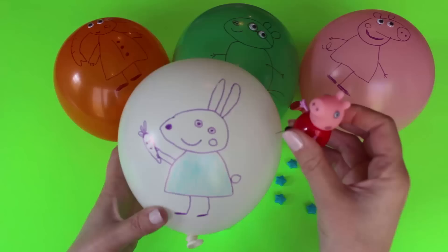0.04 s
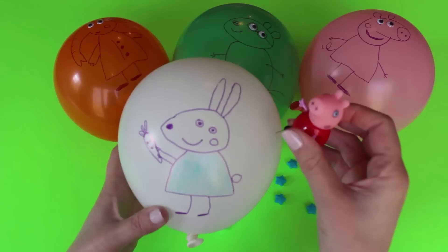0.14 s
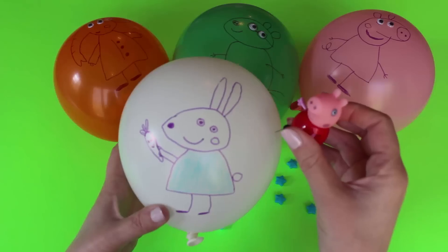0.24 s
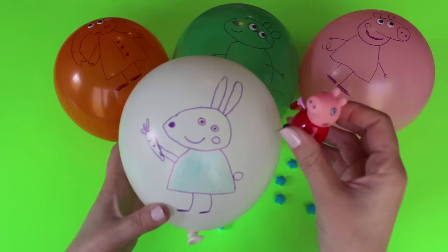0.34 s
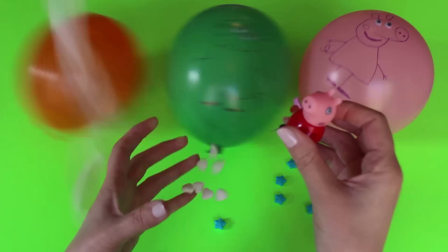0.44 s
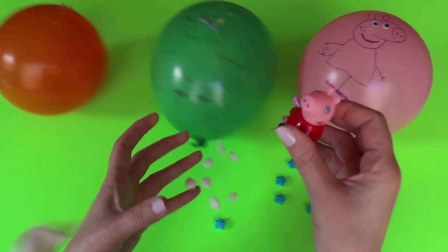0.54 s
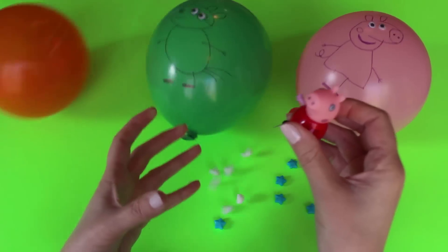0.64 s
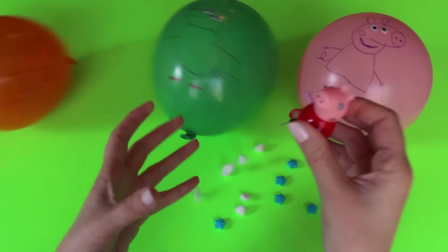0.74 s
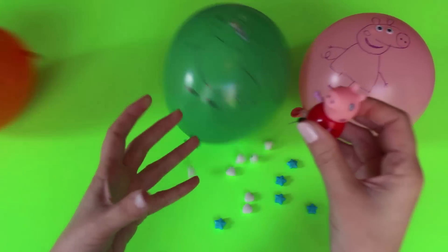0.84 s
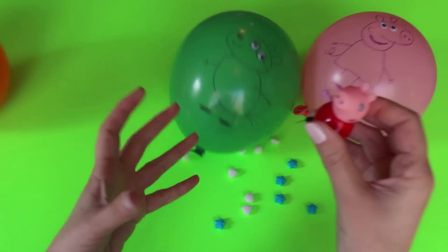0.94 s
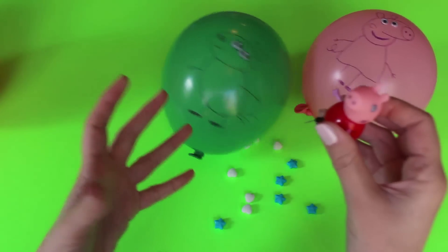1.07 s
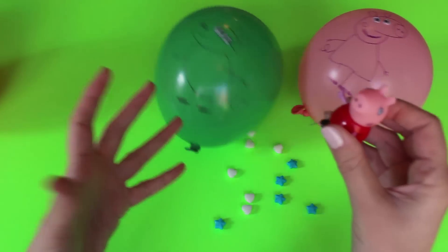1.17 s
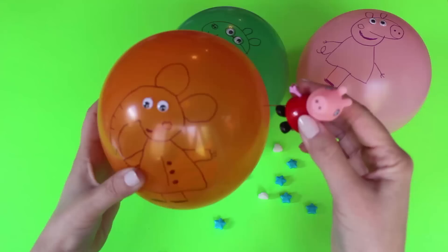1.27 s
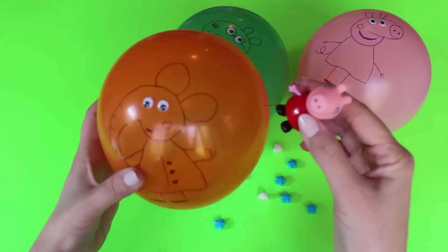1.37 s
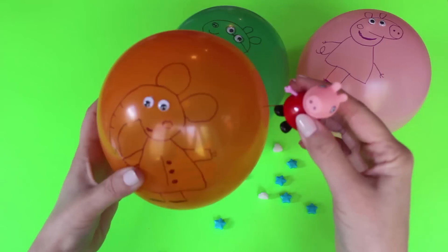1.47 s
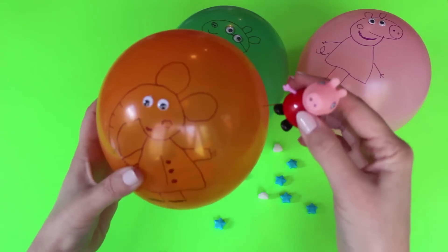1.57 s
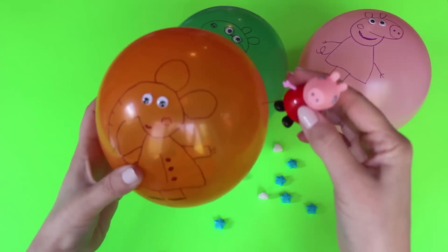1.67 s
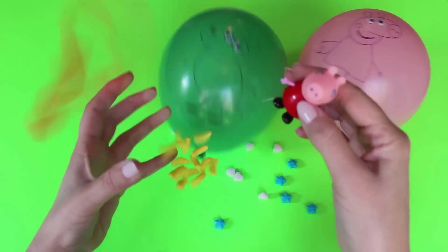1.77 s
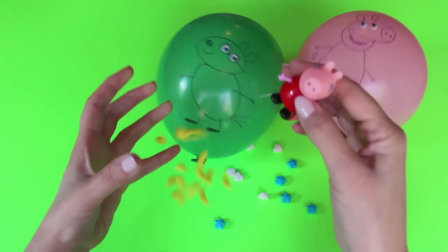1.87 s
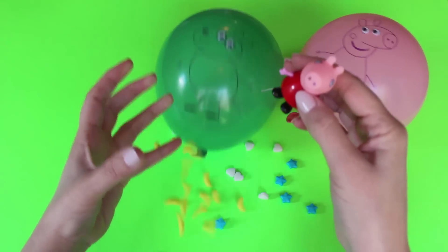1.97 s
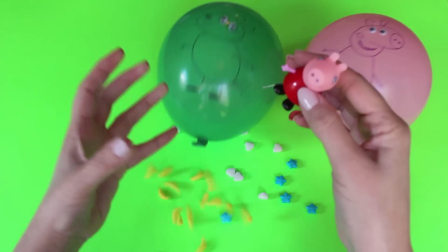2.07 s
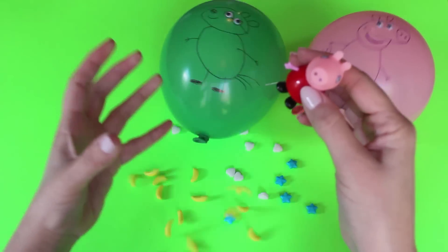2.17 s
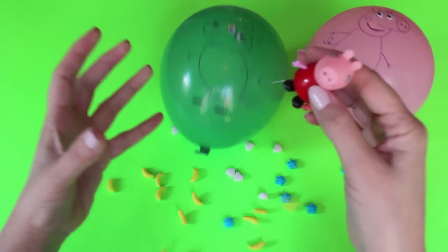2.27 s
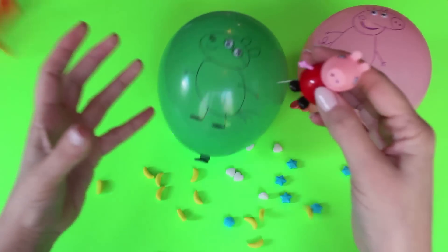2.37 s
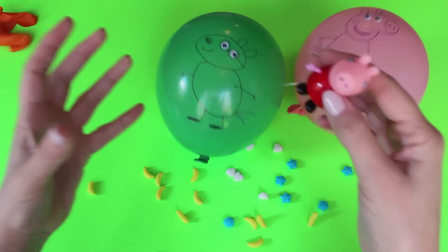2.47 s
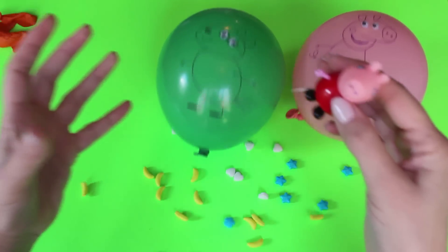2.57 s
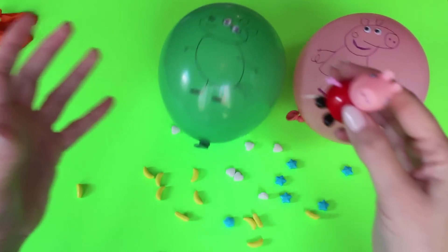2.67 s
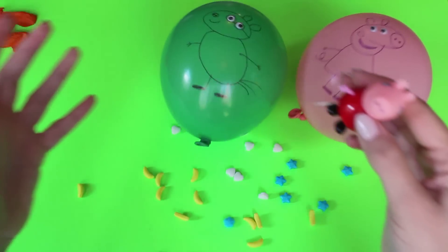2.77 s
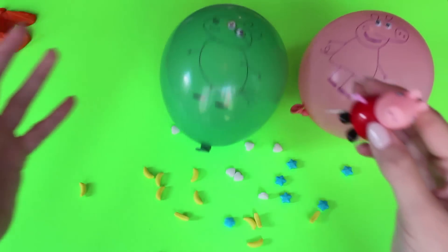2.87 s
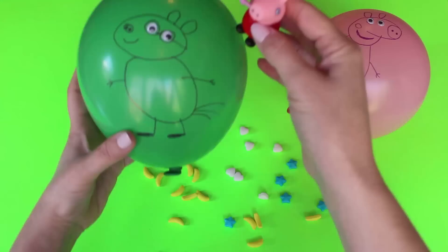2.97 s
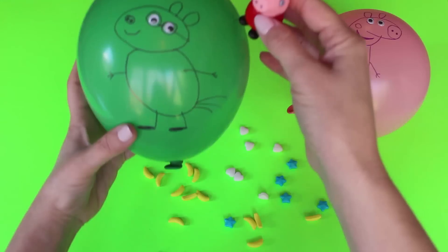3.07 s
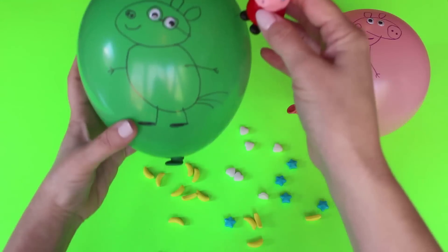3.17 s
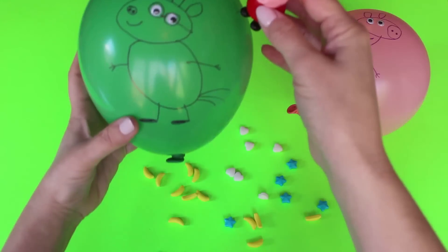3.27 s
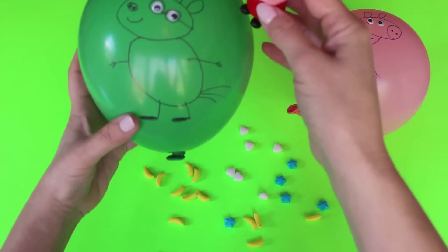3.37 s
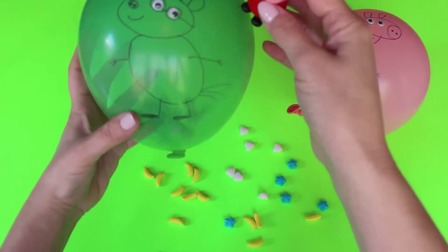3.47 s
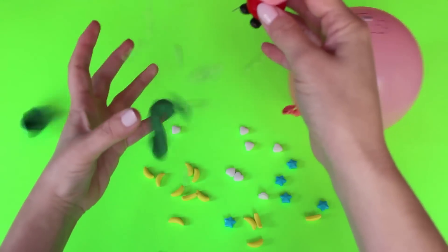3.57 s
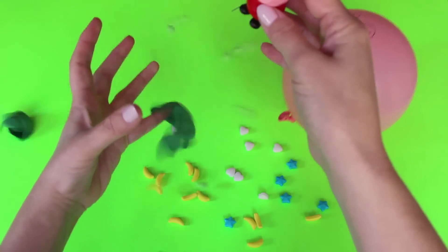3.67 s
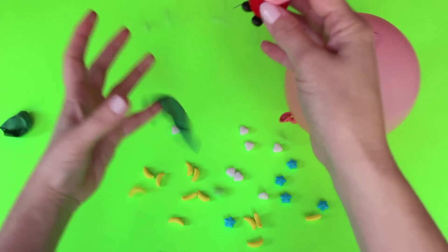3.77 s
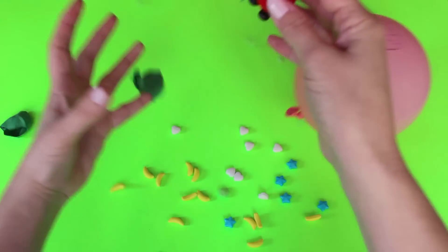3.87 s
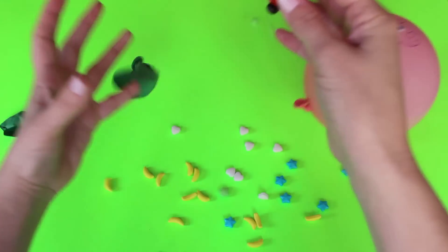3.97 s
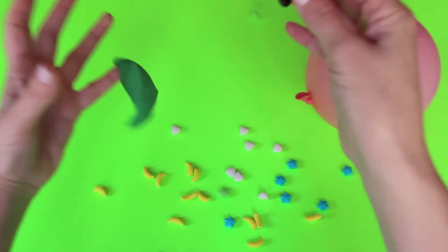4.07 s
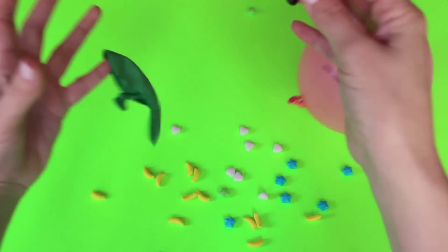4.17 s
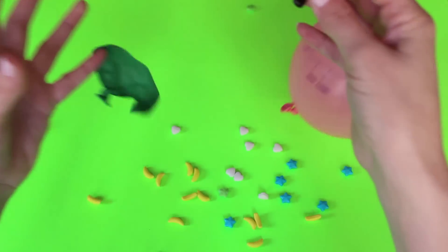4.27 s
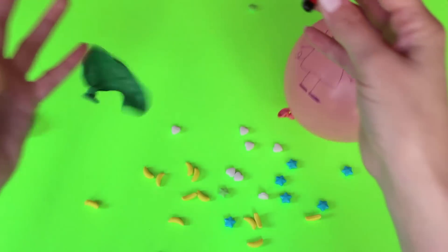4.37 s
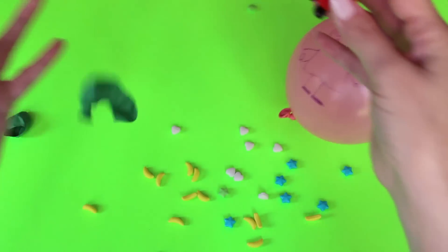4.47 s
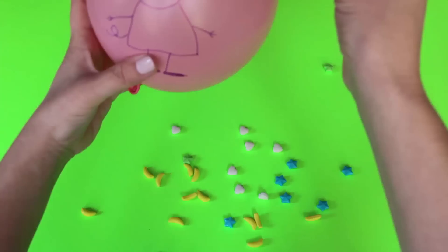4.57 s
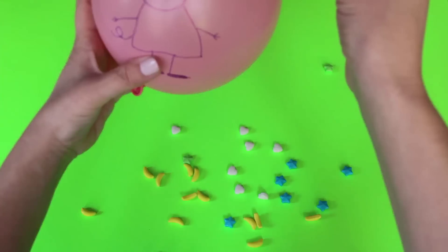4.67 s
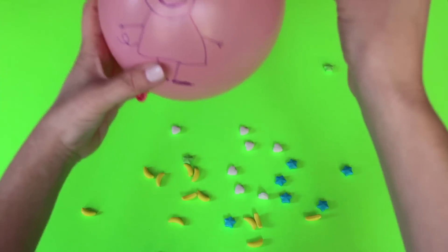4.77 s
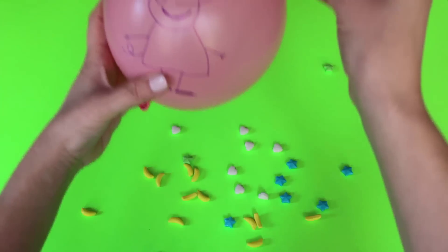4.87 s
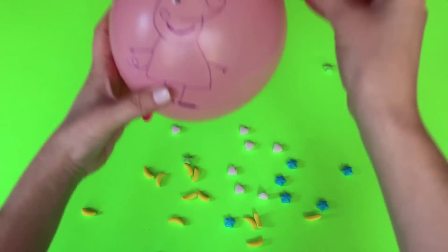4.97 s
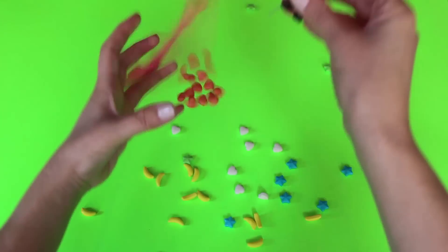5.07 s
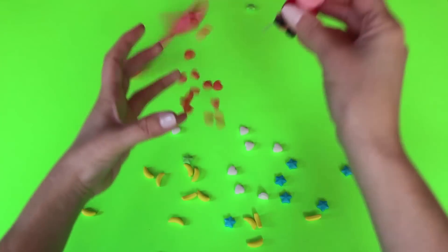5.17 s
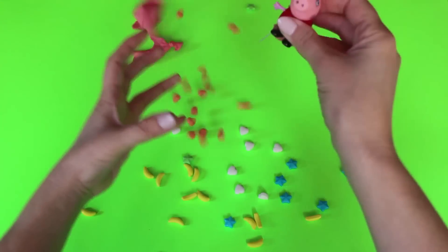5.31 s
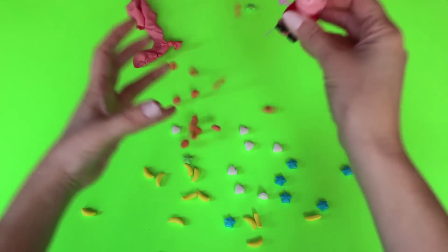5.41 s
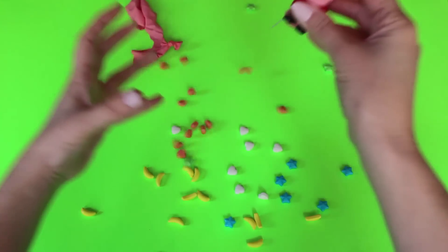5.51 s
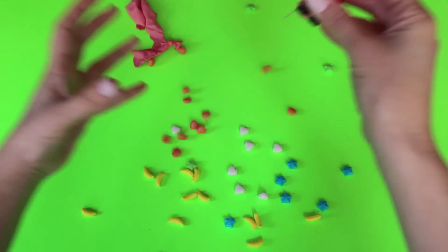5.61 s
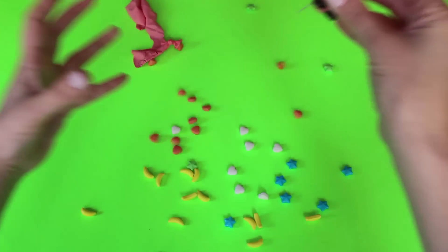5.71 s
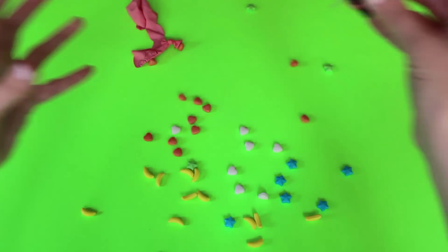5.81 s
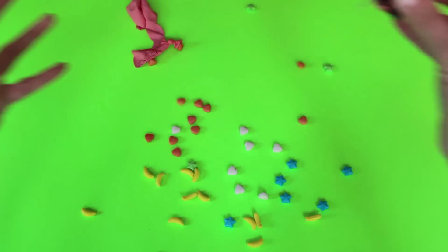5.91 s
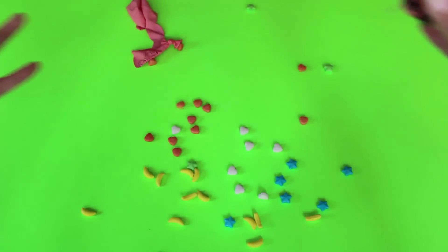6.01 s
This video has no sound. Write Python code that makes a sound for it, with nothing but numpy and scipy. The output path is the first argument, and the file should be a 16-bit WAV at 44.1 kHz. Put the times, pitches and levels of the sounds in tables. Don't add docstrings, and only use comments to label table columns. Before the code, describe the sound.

A short rattle and rub of hands on rubber opens over quiet room hum and hiss. At about 0.45 s the first balloon tears slowly with a tick and rip, then its air collapses in a clipped thump. The gain ducks and climbs, holding up a boomy, diffuse echo; soft bumps and sweets tick from 0.8 s until the sound drops abruptly to hush at 1.33. A quicker burst at 1.81 has a similar echo, with sparse hard ticks between 2.06 and 2.83, cutting near 3.03. The third bangs at 3.57; from 3.94 to 4.26 rubber scraps slap loudly and beads clatter, with a heavy knock at 4.15, ending at 4.60. The last, sharpest burst comes at 5.14, followed by sweets pattering left and right from 5.35 to 5.72, then a fading skitter and near silence after 6.05. The recorder is close in a bare room.

```python
import sys
import numpy as np
from scipy import signal
from scipy.fft import rfft, irfft, next_fast_len
from scipy.io import wavfile

SR = 44100
rng = np.random.default_rng(int(sys.argv[2]) if len(sys.argv) > 2 else 0)


def ratio(d):
    e = np.asarray(d, float) / 20
    return 10 ** e


def wrap_up_sound(samples):
    columns = np.atleast_2d(samples).T
    tamed = np.clip(columns, -1, 1)
    steps = np.round(tamed * 32767).astype(np.int16)
    wavfile.write(sys.argv[1], SR, steps)


N = 266663
T = np.arange(N) / SR
SIZE = next_fast_len(N)
HZ = np.maximum(np.arange(SIZE // 2 + 1) * SR / SIZE, 1)


def on_log(table, column=1):
    table = np.array(table, float)
    return np.interp(np.log(HZ), np.log(np.maximum(table[:, 0], 1)), table[:, column])


def unit(x):
    return x / np.sqrt(np.mean(x ** 2))


def band(x, hz, width_hz):
    b, a = signal.iirpeak(hz, hz / width_hz, fs=SR)
    return signal.lfilter(b, a, x)


def ring(t, hz, t60):
    return np.sin(2 * np.pi * hz * t) * ratio(-60 * t / t60)


def add(out, s, sound):
    i = int(s * SR)
    out[:, i:i + sound.shape[-1]] += sound[..., :N - i]


# frequency in Hz, left minus right in dB.
LEAN = [(60, -5.5), (110, -3.5), (200, -4.5), (370, -2), (690, -1), (1260, -1), (2330, -0.5), (4280, -0.5),
        (7870, -1), (14500, 3)]


def pair(colour, likeness):
    mid, side = rfft(rng.standard_normal((2, SIZE)))
    c = on_log(likeness)
    lean = on_log(LEAN) / 2
    both = np.sqrt(1 + c) * mid + np.sqrt(1 - c) * side * np.array([[1], [-1]])
    return both * ratio(on_log(colour) + np.array([lean, -lean]))


# skin tear in seconds, air collapse in seconds, change of scene in seconds.
POPS = [
    (.4517, .4849, 1.3344),
    (1.8119, 1.8210, 3.0344),
    (3.5653, 3.5658, 4.6014),
    (5.1440, 5.1450, 6.046),
]


def shots():
    age, on = np.zeros(N), np.zeros(N)
    for tear, _, cut in POPS:
        inside = (T > tear) & (T < cut)
        age[inside] = T[inside] - tear
        on[inside] = 1
    return age, on


def per_shot(table):
    balloon = np.minimum(np.searchsorted([cut for *_, cut in POPS], T), len(POPS) - 1)
    return np.array(table, float)[balloon].T


# level in dB, swell in dB.
HUSH = [(-63, 3.5), (-62.5, 2.5), (-62.5, 4), (-63, 3)]
# frequency in Hz, density in dB per Hz.
HUM = [(30, -6), (60, -10.5), (100, -7.5), (150, 1), (300, -4.5), (700, -11), (1400, -17), (3000, -19.5),
       (8000, -29.5), (12000, -38.5), (14000, -46.5)]
# frequency in Hz, left-right likeness from -1 to 1.
HUM_LIKENESS = [(60, 0), (130, 0.67), (290, 0.6), (630, 0.7), (1380, -0.17), (3020, 0.05), (6610, 0),
                (14500, 0.26)]
SWELL_S = .07


def hush():
    level_db, swell_db = per_shot(HUSH)
    wait_s = np.maximum(per_shot(POPS)[0] - T, 0)
    noise = unit(irfft(pair(HUM, HUM_LIKENESS), SIZE)[:, :N])
    return noise * ratio(level_db + swell_db * np.exp(-wait_s / SWELL_S))


# start in seconds, stop in seconds, centre in Hz, width in Hz,
# level in dB.
RUSTLE = [
    (0, 0.064, 4940, 503, -40),
    (0, 0.033, 2500, 3180, -42),
    (0.035, .0676, 300, 550, -36),
]


def rustle():
    out = np.zeros((2, N))
    for start, stop, hz, width_hz, level_db in RUSTLE:
        uneven = ratio(1.4 * np.repeat(rng.standard_normal(64), 64))
        noise = rng.standard_normal((3, 4096)) * uneven
        noise = noise[0] + 0.96 * noise[1:]
        noise = unit(band(band(noise, hz, width_hz), hz, 3 * width_hz))
        add(out, start, ratio(level_db) * noise[:, :int((stop - start) * SR)])
    return out


# time in seconds, swell of boom and rumble
# in dB, length in seconds.
BUMPS = [(0.81, 6, 0.009), (0.9, 4.5, 0.022), (1.03, 2, 0.025), (1.277, 10.5, 0.059), (2.08, 0.5, 0.01),
         (3.861, 3.5, .03), (3.991, -2, 0.0061), (4.17, 7, 0.024), (5.414, 3, 0.01), (5.544, 3.5, 0.017),
         (5.78, 3, 0.0091), (5.863, 2, 0.027)]


def bumps():
    return sum(db * np.exp(-((T - s) / length) ** 2) for s, db, length in BUMPS)


# frequency in Hz, left-right likeness from 0 to 1.
LIKENESS = [(60, .9), (130, 0.95), (290, .95), (630, 0.8), (1380, 0.7), (3020, 0.3), (6610, 0), (14500, 0)]
# table rumble at the tear in dB, rumble fall in dB per second,
# skitter relative to the echo in dB.
SHAKE = [(-34, 14.5, -25.5), (-34, 45.5, -27.5), (-35.5, 43, -23.5), (-31, 65, -24.5)]
RUMBLE_FLOOR_DB = -77


def rumble(age):
    # Hz, dB per Hz
    colour = [(20, -16), (45, -12.0), (80, -9.5), (130, -4.5), (170, 5.0), (300, -43.0)]
    low = irfft(pair(colour, LIKENESS), SIZE)[:, :N]
    start_db, fall, _ = per_shot(SHAKE)
    return unit(low) * (ratio(start_db - fall * age + 0.5 * bumps()) + ratio(RUMBLE_FLOOR_DB))


def after(falls, fade_s):
    jumps = np.zeros(N)
    for s, peak_db, *_ in falls:
        jumps[int(s * SR)] += ratio(peak_db)
    return signal.lfilter([1], [1, -np.exp(-1 / (fade_s * SR))], jumps)


# held level in dB, end of the hold in seconds after the
# tear, later fall in dB per second, boom fall in dB per second.
TAILS = [(-28, 0.42, 38, 8.5), (-25.5, 0.49, 35.5, 21.5), (-26.5, .55, 25, 23.5), (-25.5, 0.39, 43, 19)]
DUCK_DB, RECOVER_S, KNEE_S = 11.5, .13, .04
EARLY_DB, EARLY_S = 13.5, 0.041
SLAP_DUCK_DB, SLAP_RECOVER_S = 4.5, 0.026


def echo_level(age, falls):
    held_db, held_s, fall, _ = per_shot(TAILS)
    free_s = KNEE_S * np.logaddexp(0, (age - held_s) / KNEE_S)
    duck_db = DUCK_DB * np.exp(-age / RECOVER_S) + SLAP_DUCK_DB * after(falls, SLAP_RECOVER_S)
    return held_db - duck_db + EARLY_DB * np.exp(-age / EARLY_S) - fall * free_s


# frequency in Hz, density in dB per Hz.
ROOM = [(35, -55), (60, -34), (129, -15), (251, 5.5), (408, 1.5), (525, -3), (914, -9.5), (1050, -9),
        (1740, -14), (4010, -15), (11100, -36), (13300, -61.5), (14900, -77)]
# frequency in Hz, fade against the middle band in dB per second,
# share of the boom from 0 to 1.
FADE = [(90, -20, 1), (148.1, -7.5, 0.88), (300, 2.5, 0.94), (626, 4, 0.6), (1010, 0.5, 0.12),
        (1800, 2, 0.03), (3500, -0.5, 0), (6100, -19, 0.3), (10920, -35, 0)]
# frequency in Hz, then dB for the first, second, third and
FULLNESS = [(160, 0, -1.5, 1.98, 0.2), (300, 0.5, -1.8, 0.46, 0.66), (700, -3, 3, 0, -3),
            (1090, 2, 3, 0, 1.6), (2500, 0.5, -2.5, 1.1, 0.1)]
BOOM_DB = 11
BOOM_LATE_DB, BOOM_BUILD_S = 6, .02


def room(age, echo_db):
    spectrum = pair(ROOM, LIKENESS)
    boom_db = BOOM_DB - per_shot(TAILS)[3] * age + bumps()
    boom_db = boom_db - BOOM_LATE_DB * np.exp(-age / BOOM_BUILD_S)
    middle_band = irfft(spectrum * ((HZ > 700) & (HZ < 3500)), SIZE)
    middle = np.sqrt(np.mean(middle_band ** 2))
    full = np.array(FULLNESS, float)
    out = 0
    for k, (hz, fade_db, share) in enumerate(FADE):
        hat = on_log([(f, j == k) for j, (f, *_) in enumerate(FADE)])
        full_db = per_shot([np.interp(np.log(hz), np.log(full[:, 0]), c) for c in full[:, 1:].T])
        level_db = fade_db * age + share * (boom_db - 9.0) + full_db
        out = out + irfft(spectrum * hat, SIZE)[:, :N] * ratio(level_db)
    return out / middle * ratio(echo_db)


# start in seconds, skitter level in dB, fade time constant in
# seconds, share of the finer, higher colour from 0 to 1.
SLIDES = [(0.881, -54.5, 0.19, 1), (1.19, -63, 0.45, .9), (2.04, -56, .03, 0.2), (2.43, -58, 0.019, 1),
          (2.49, -61, 0.022, .7), (2.682, -50.5, 0.085, 0.66), (4.088, -24.5, 0.0087, 0.4),
          (4.1, -41, 0.073, 0.3), (4.5, -73, 0.031, 0.1), (5.33, -51, 0.066, 0.6), (5.5, -50, 0.16, 0.7),
          (5.7, -54, 0.045, 1), (5.93, -68, 0.11, 1)]
RATTLE_DB, RATTLE_S = 10.5, 0.045
SCATTER_DB, SCATTER_T60_S = -39, 0.21


def skitter(age, echo_db, falls):
    sizes = ratio(2.5 * np.minimum(rng.exponential(size=N), 3.5))
    grains = (rng.random(N) < 500 / SR) * sizes
    busy = signal.lfilter([1], [1, -np.exp(-1 / (0.00099 * SR))], grains)
    noise = rng.standard_normal((3, N))
    dense = rfft((unit(busy) + 0.78) * (0.21 * noise[0] + noise[1:]), SIZE)
    # Hz, dB
    bright_colour = [(2500, -40.0), (5000, 9.0), (7000, 3.5), (10000, -13.5), (14000, -22.5)]
    fine_colour = [(4000, -29), (7000, 1), (11000, 0), (14000, -7)]
    bright = unit(irfft(dense * ratio(on_log(bright_colour)), SIZE)[:, :N])
    fine = unit(irfft(dense * ratio(on_log(fine_colour)), SIZE)[:, :N])
    rolling = ratio(echo_db + per_shot(SHAKE)[2] + RATTLE_DB * np.exp(-age / RATTLE_S))
    scattered = ratio(SCATTER_DB) * after(falls, SCATTER_T60_S / np.log(1000))
    sliding = 0
    for s, db, fade_s, share in SLIDES:
        level = (T > s) * ratio(db) * np.exp(-np.maximum(T - s, 0) / fade_s)
        sliding = sliding + level * (bright + share * (fine - bright))
    return (bright * (rolling + scattered) + sliding) * ratio(6.5)


# time in seconds, peak in dB, left minus right in dB.
SWEETS = [(0.8924, -23.5, 0), (0.9077, -30, 0), (1.0048, -32, 5), (1.1866, -35.5, 0), (1.2682, -31.5, 0.5),
          (1.2994, -42, 2.5), (1.3154, -35.5, 7), (2.0608, -29, 5), (2.0774, -25, 6), (2.3488, -21.5, -1),
          (2.3614, -41, 9), (2.4969, -22.5, 4), (2.6087, -38, 0), (2.683, -53, -0.5), (2.8226, -29.5, 4.5),
          (2.8332, -38, 8.5), (5.3503, -24, -12), (5.4255, -21, 7), (5.4606, -25, -19), (5.5123, -21, 0),
          (5.586, -20.5, 1), (5.6152, -25.5, -0.5), (5.644, -24.5, 2), (5.7189, -24.5, 2.5)]
SWEET_HZ, SWEET_SPREAD, SWEET_T60_S, SWEET_CRACK = 3100, 0.055, .012, 0.29
# time in seconds, peak in dB, ring in Hz,
# left minus right in dB.
SCRAPS = [(3.9371, -33, 7900, 1.5), (3.9401, -14, 4320, 3), (3.9625, -23.5, 3300, 1),
          (4.0045, -19, 4870, -2), (4.0274, -32.5, 7040, 1.5), (4.0339, -21, 5955, -1),
          (4.0495, -24, 5006, 1), (4.0765, -33, 8920, 2), (4.0817, -9, 4560, -3.5),
          (4.0892, -12.5, 5480, 0.5), (4.0924, -9.5, 4320, 2.5), (4.0974, -26.5, 4000, 9),
          (4.1054, -29.5, 5520, 5.5), (4.1501, -19.5, 2500, -6), (4.1745, -18, 4260, -2.5),
          (4.1867, -17.5, 4900, -3), (4.1935, -35, 5000, -4), (4.2567, -16.5, 4630, -1),
          (4.3671, -30.5, 4100, 5), (4.4414, -48.5, 4040, 2.5), (4.4744, -57, 5300, -5),
          (4.5193, -55, 4380, 1), (4.5257, -32.5, 4360, 2), (4.5594, -59, 4390, .5)]
SCRAP_T60_S, SCRAP_CRACK = .013, .14


def landings():
    scale = np.exp(SWEET_SPREAD * rng.standard_normal(len(SWEETS)))
    sweets = [(s, db, SWEET_HZ * k, pan, SWEET_T60_S, SWEET_CRACK)
              for (s, db, pan), k in zip(SWEETS, scale)]
    scraps = [(*row, SCRAP_T60_S, SCRAP_CRACK) for row in SCRAPS]
    return sweets + scraps


# time in seconds, peak in dB, pitch in Hz, t60 in seconds.
KNOCKS = [(.4642, -10, 800, .006), (.816, -16, 300, .03), (.879, -16, 300, .03), (1.763, -56, 1900, .02),
          (2.3488, -14, 3000, .004), (2.4969, -18, 2800, .004), (2.8232, -25, 2050, .016),
          (2.823, -25, 3300, .003), (4.0895, -16, 1500, .012), (4.1508, -1, 430, .016),
          (4.258, -22, 1800, .012), (4.515, -28, 1050, .04), (4.56, -30, 950, .04)]


def ticks(on, falls):
    out, t = np.zeros((2, N)), T[:int(.06 * SR)]
    chance = rng.standard_normal((len(falls), 3, len(t)))
    for (s, peak_db, hz, pan_db, t60, share), noise in zip(falls, chance):
        noise = noise[0] + .55 * noise[1:]
        crack = unit(band(noise, 5000, 6500)) * ratio(-60 * t / .005)
        body = band(band(band(noise, hz, 0.52 * hz), hz, hz), hz, 1.9 * hz)
        body = unit(body) * ratio(-60 * t / t60)
        hit = share * crack + (1 - share) * body
        pan = np.array([[pan_db], [-pan_db]]) / 2
        add(out, s, hit / np.abs(hit).max() * ratio(4.0 + peak_db + pan))
    tail = T[:int(.8 * SR)]
    noise = rng.standard_normal((2, len(tail)))
    dull = band(band(noise, 4500, 4500), 4500, 7000) * ratio(-60 * tail / 1.2 - 36.5)
    bright = band(band(noise, 7500, 6000), 7500, 9000) * ratio(-60 * tail / .35 - 43.5)
    wash = signal.fftconvolve(out, dull + bright, axes=1)[:, :N]
    out = on * (out + wash)
    for s, peak_db, hz, t60 in KNOCKS:
        add(out, s, ratio(peak_db) * ring(t, hz, t60) * (1 - np.exp(-t * hz * 4)))
    return signal.sosfilt(signal.butter(2, 130, "high", fs=SR, output="sos"), out)


# rip level in dB, rip t60 in seconds, shred level in dB.
SKINS = [
    (-18.5, 0.1, -20),
    (-15.5, .08, -22),
    (-12.5, 0.059, -23),
    (-4, 0.013, -23),
]
# inrush in seconds, rebound pitch in Hz, table echo delay in
# seconds, echo level in dB.
COLLAPSE = [(.0014, 190, .002, 1), (.00095, 185, .002, 5), (.0012, 235, .0026, -9), (.0013, 200, .0015, 3)]
FRONT_DB, AIR_DB, AIR_T60_S = 9, 4.5, .022


def bursts():
    out, t = np.zeros((2, N)), T[:int(.12 * SR)]
    lean = ratio(np.array([[-2], [2]]))
    for (tear, fall, _), (rip_db, rip_t60, shred_db), air in zip(POPS, SKINS, COLLAPSE):
        inrush, hz, echo, echo_db = air
        noise = rng.standard_normal((3, len(t)))
        rough = noise[0] + .5 * noise[1:]
        low_rip = unit(band(rough, 1300, 1200))
        high_rip = unit(band(band(rough, 3100, 2800), 4500, 4200))
        add(out, tear, ratio(rip_db) * (low_rip + 0.13 * high_rip) * ratio(-60 * t / rip_t60))
        add(out, tear, -4 * ring(t, 2700, .0006))
        front = np.sin(np.pi * np.minimum(t / inrush, 1))
        add(out, fall, -ratio(FRONT_DB) * lean * front)
        add(out, fall + .85 * inrush, ratio(AIR_DB) * lean * ring(t, hz, AIR_T60_S))
        add(out, fall + echo, -ratio(echo_db + 8) * ring(t, 1100, .0015))
        shreds = unit(band(band(rough, 2700, 5100), 2900, 6000))
        add(out, fall + .004, ratio(shred_db) * shreds * ratio(-60 * t / .03))
    return out


def scene():
    age, on = shots()
    falls = landings()
    echo_db = echo_level(age, falls)
    build = on * (1 - np.exp(-age / 0.0015))
    lasting = room(age, echo_db) + rumble(age) + skitter(age, echo_db, falls)
    loud = bursts() + ticks(on, falls) + build * lasting + rustle()
    return signal.sosfilt(signal.butter(2, 52, "high", fs=SR, output="sos"), loud) + hush()


def top_cut(x):
    return signal.sosfilt(signal.butter(12, 15080, fs=SR, output="sos"), x)


CEILING = .7


def record(dry):
    x = signal.sosfilt(signal.butter(2, 11000, fs=SR, output="sos"), dry)
    x = signal.sosfilt(signal.cheby1(6, 1, 13300, fs=SR, output="sos"), x)
    x = np.clip(x, -CEILING, CEILING)
    x = signal.sosfilt(signal.butter(8, 14300, fs=SR, output="sos"), x)
    return top_cut(x)


dry = scene()
out = record(dry)
wrap_up_sound(out)
```